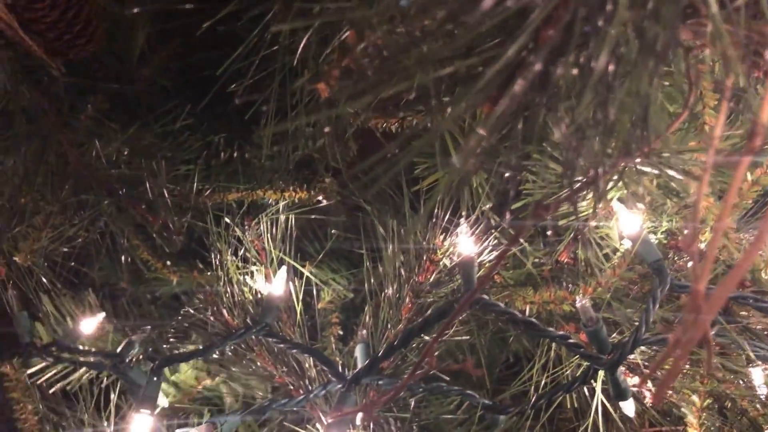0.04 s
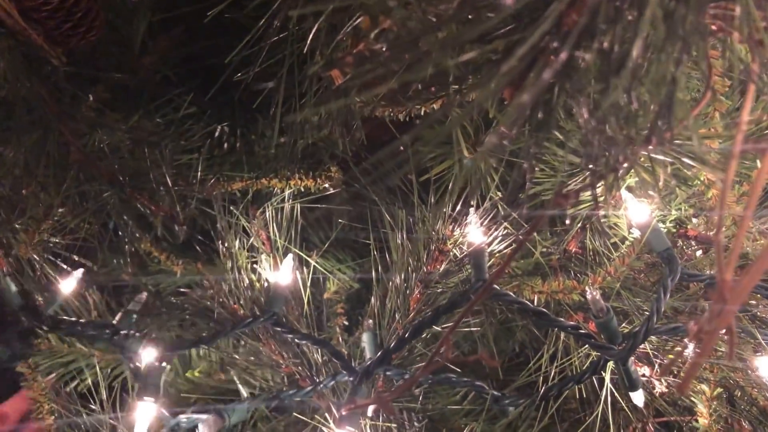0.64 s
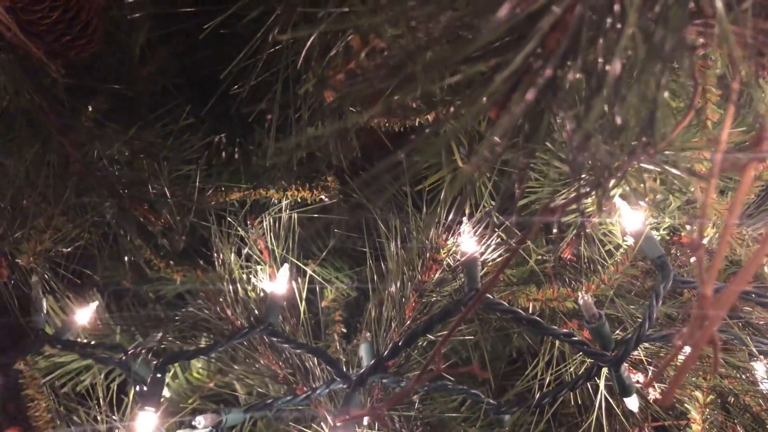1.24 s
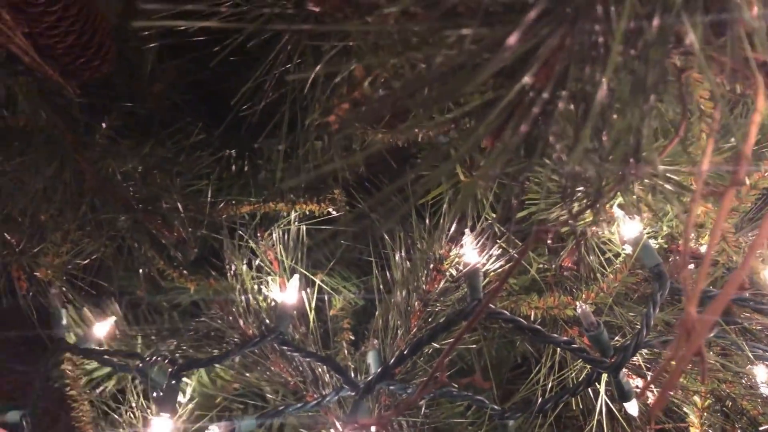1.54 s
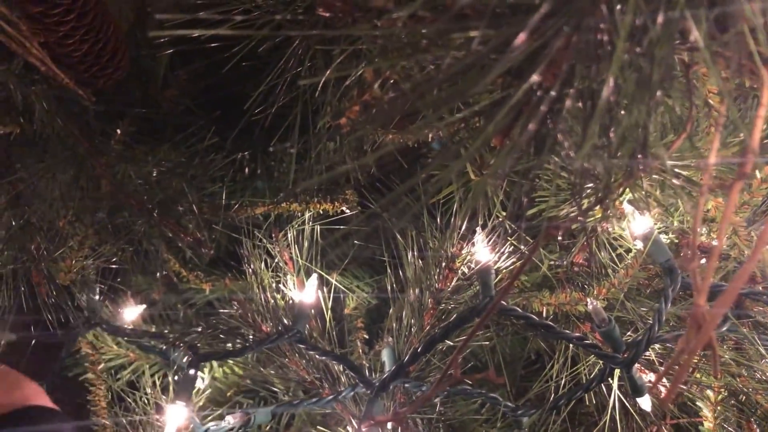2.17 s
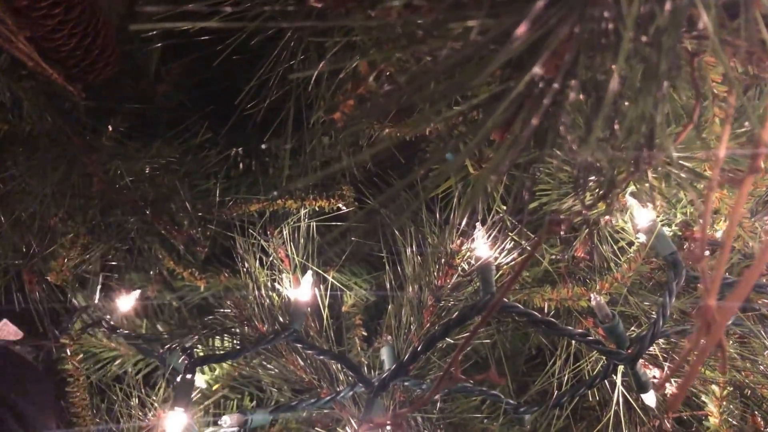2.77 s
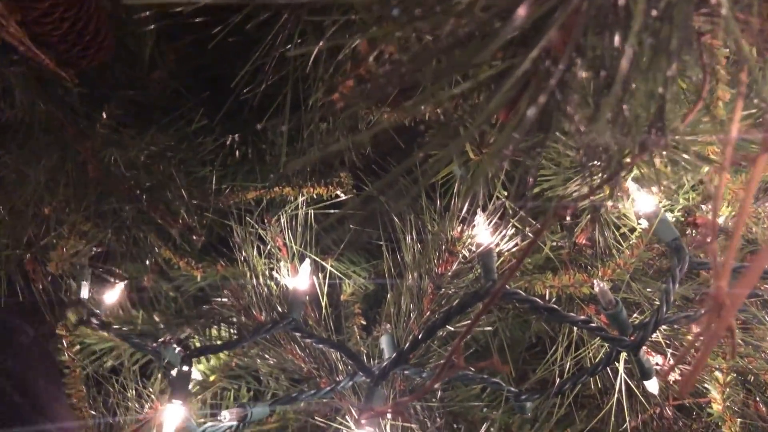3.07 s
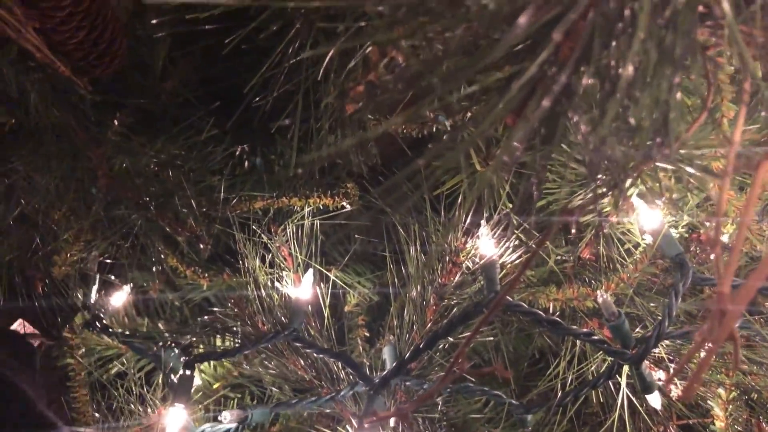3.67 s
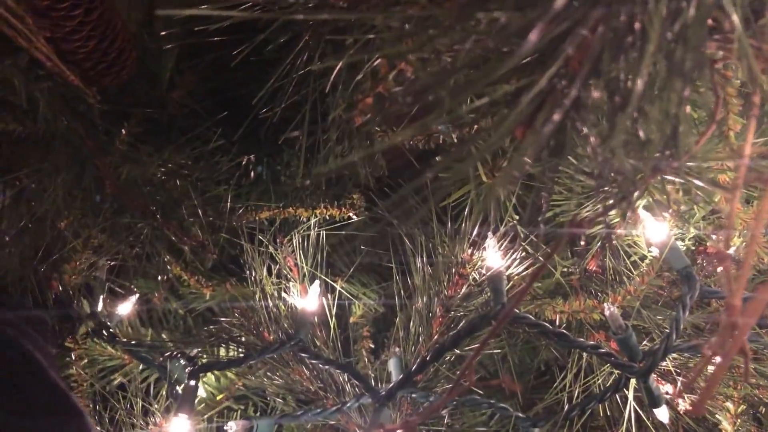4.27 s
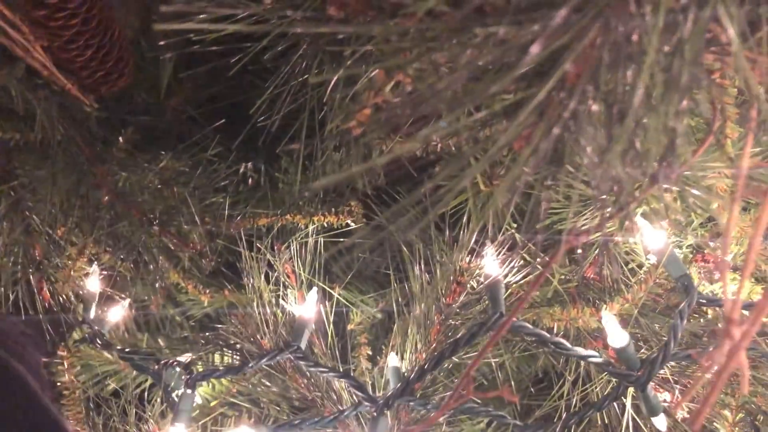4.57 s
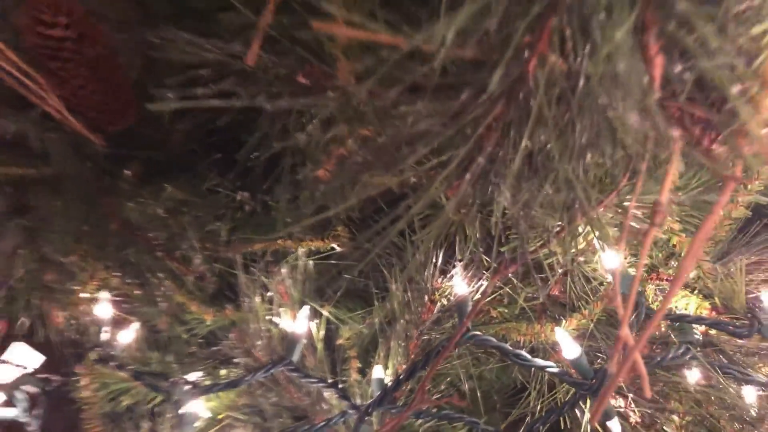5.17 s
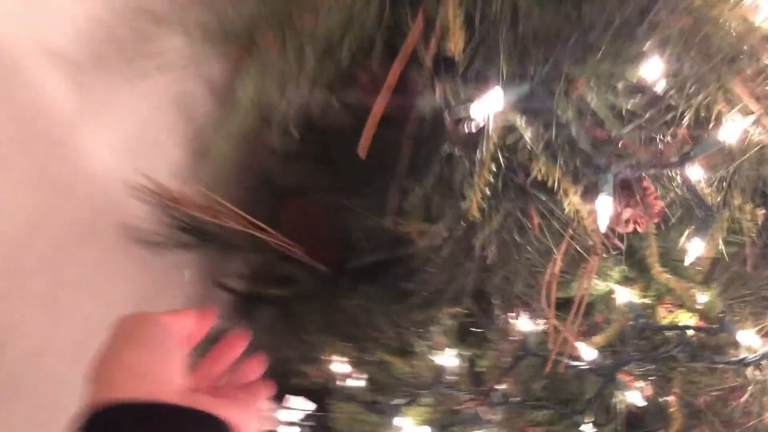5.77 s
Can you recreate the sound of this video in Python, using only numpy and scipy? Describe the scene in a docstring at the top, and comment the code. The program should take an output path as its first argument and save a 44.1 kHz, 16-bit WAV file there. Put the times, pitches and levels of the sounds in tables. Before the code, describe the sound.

Hands move through an artificial tree close to the microphone in a quiet room, making a soft, uneven hiss of plastic needles with tiny flicks throughout. Faint knocks further off lead to one distinct hollow knock at about 0.6 seconds. From 1 second, twigs and light wires stick and slip with small, sharp clicks and snaps. Between 1.6 and 2.3 seconds the clicks grow busier, joined by low thuds of wire branches springing back and a faint ring from the tree's frame. After a quieter moment, a crisp snap stands out near 3.3 seconds, followed by light ticks and bumps. From 4.1 to 4.7 seconds comes the loudest cluster, with sharp snaps and two heavier thumps at about 4.4 and 4.6. From around 5 seconds an arm sweeps through the needles in a smoother, fuller rustle, with a few last clicks before 6 seconds.

```python
"""Hands in an artificial fir

Close by in a quiet room, friction on plastic needles makes a hiss dotted with tiny flicks. Twigs and
light wires stick, slip and snap; wire branches thud as they spring back and set the frame ringing.
Hollow knocks, one of them distinct, come from further off. At the end an arm sweeps through the needles."""
import sys
import numpy as np
from scipy import signal
from scipy.fft import rfft, irfft, next_fast_len
from scipy.io import wavfile
from scipy.ndimage import uniform_filter1d

SR = 44100
rng = np.random.default_rng(int(sys.argv[2]) if len(sys.argv) > 2 else 0)


def unload_audio(sound):
    """Save the sound as a 16-bit wav file, at the path given as the first command line argument."""
    columns = np.transpose(np.atleast_2d(sound))
    # keep every value between -1 and 1, then stretch to whole-number steps
    steps = np.round(np.clip(columns, -1, 1) * 32767)
    wavfile.write(sys.argv[1], SR, steps.astype(np.int16))


N = 256328
TIME = np.arange(N) / SR


def undb(db):
    """Decibels to amplitude ratio."""
    return 10 ** (np.asarray(db) / 20)


def unit(x):
    """Normalisation to an rms of 1."""
    return x / np.sqrt(np.mean(x ** 2))


def add(out, start_s, x):
    """Superposition: x joins out from start_s on."""
    i = max(int(start_s * SR), 0)
    out[i:i + len(x)] += x[:max(len(out) - i, 0)]


def colour(x, outline):
    """Minimum-phase filtering to an outline of (frequency_hz, gain_db) points."""
    size = next_fast_len(2 * len(x), True)
    size += size % 2
    hz, db = np.transpose(outline)
    bins_hz = np.maximum(np.fft.rfftfreq(size, 1 / SR), 1)
    gain = undb(np.interp(np.log(bins_hz), np.log(hz), db))
    cepstrum = irfft(np.log(gain))
    cepstrum[1:size // 2] *= 2  # folding the cepstrum makes the filter causal
    cepstrum[size // 2 + 1:] = 0
    return irfft(rfft(x, size) * np.exp(rfft(cepstrum)))[:len(x)]


def resonate(x, hz, q, soft=1.93):
    """Second-order resonance; finite contact time rolls off the response above soft * hz."""
    s = 1j * np.fft.rfftfreq(2 * len(x), 1 / SR) / hz
    resonance = s / (q * (s * s + 1) + s)
    rolloff = 1 + np.sqrt(2) * s / soft + (s / soft) ** 2
    return irfft(rfft(x, 2 * len(x)) * resonance / rolloff)[:len(x)]


def wander(rate_hz):
    """Smooth random modulation with an rms of 1."""
    step = max(int(SR / rate_hz), 1)
    stairs = np.repeat(rng.standard_normal(N // step + 1), step)
    return unit(uniform_filter1d(stairs, step)[:N])


def burst(x, level_db):
    """Equivalent level: the energy of the hit, spread over 10 ms, is scaled to level_db."""
    return x * undb(level_db) / np.sqrt(np.sum(x ** 2) / (SR / 100))


def needles(outline, grit, per_s, spread_db, flick_s):
    """Shot noise: unequal flicks over a smooth sliding hiss; grit is the flicks' share of the power."""
    sizes = undb(spread_db * np.minimum(rng.exponential(size=N), 4))
    flicks = (rng.random(N) < per_s / SR) * sizes
    power = signal.lfilter([1], [1, -np.exp(-1 / (flick_s * SR))], flicks ** 2)
    envelope = np.sqrt(grit * power / power.mean() + 1 - grit)
    return unit(colour(envelope * rng.standard_normal(N), outline))


def pings(low_hz=3000, high_hz=12000, lengths=22, per_s=8, spread_db=3, q=8, scrape_s=0.0032):
    """Plucked cantilevers: needles scrape past a finger and spring free, each length at its own pitch."""
    out = np.zeros(N)
    for hz in np.geomspace(low_hz, high_hz, lengths):
        released = rng.random(N) < per_s / SR
        flicks = released * undb(spread_db * np.minimum(rng.exponential(size=N), 3))
        envelope = signal.lfilter([1], [1, -np.exp(-1 / (scrape_s * SR))], flicks + 1e-12)
        scrape = envelope * rng.standard_normal(N)
        out += signal.lfilter(*signal.iirpeak(hz, q, fs=SR), scrape)
    return unit(out)


# Spectra of brushed sprays, needle tips and swaying branches: frequency_hz, gain_db
BRUSH_SPECTRUM = [(150, -3.5), (320, -4.5), (600, -2.5), (1100, -6), (2200, -6.5), (4500, -8), (9000, -13),
                  (16000, -24.5)]
TIP_SPECTRUM = [(2000, -49), (4500, -4), (7500, -2), (11000, 0), (16000, -1.5)]
SWAY_SPECTRUM = [(25, -74), (45, 6.5), (80, 5.5), (150, 2.5), (240, 1), (400, -28.5), (900, -52)]
# The hands' activity, before each layer's trim: time_s, brush_db, tips_db, sway_db
HAND_LEVELS = [(0.0, -60.5, -56.5, -55), (0.36, -64, -62, -63), (0.72, -61, -57, -59),
               (0.98, -66, -67, -61.5), (1.14, -56.5, -59, -59), (1.55, -59, -59.5, -61),
               (1.8, -55.5, -53, -48), (2.12, -62, -57, -53.5), (2.38, -61, -56, -57.5),
               (3.08, -67, -64.5, -61), (3.38, -59, -57, -56.5), (3.56, -59.5, -84, -53),
               (3.9, -69.5, -77, -49), (4.16, -59.5, -72, -66), (4.48, -86, -66, -47),
               (4.59, -52.5, -61.5, -50), (4.8, -62, -74, -51.5), (5.04, -52.5, -56, -57),
               (5.4, -55.5, -57.5, -55.5), (5.81, -51.5, -46, -62.5)]


def rustle(brush_trim_db=-1, tips_trim_db=-7, sway_trim_db=-4, pings_db=1, sweep_s=5.2, blur_s=0.25):
    """Friction noise: the hands brush whole sprays, tickle the needle tips and rock the branches."""
    time_s, *levels = np.transpose(HAND_LEVELS)
    brush_db, tips_db, sway_db = (np.interp(TIME, time_s, level) for level in levels)
    # single needles stand out while fingers pick at them, and blur once the whole arm sweeps through
    distinctness = undb(np.interp(TIME, [sweep_s, sweep_s + blur_s], [-1.5, -3.5]))
    grit = 0.6 * distinctness
    sprays = needles(BRUSH_SPECTRUM, grit, per_s=230, spread_db=13, flick_s=0.009)
    tips = needles(TIP_SPECTRUM, grit, per_s=1100, spread_db=14, flick_s=0.0019)
    tips += undb(pings_db) * distinctness * pings()
    sway = unit(colour(rng.standard_normal(N), SWAY_SPECTRUM)) * undb(2 * wander(rate_hz=10))
    return (sprays * undb(brush_db + brush_trim_db)
            + tips * undb(tips_db + tips_trim_db)
            + sway * undb(sway_db + sway_trim_db))


# Spectrum of the quiet room: frequency_hz, gain_db
AIR_SPECTRUM = [(25, -34), (64, 1), (220, -5), (320, 1.5), (860, -10), (2500, -23), (7000, -42),
                (16000, -25)]


def room_air(level_db=-64):
    """Stationary background noise, strongest in the bass."""
    return undb(level_db) * unit(colour(rng.standard_normal(N), AIR_SPECTRUM))


# Spectrum of a knock's onset: frequency_hz, gain_db
KNOCK_SPECTRUM = [(120, -4), (240, 9), (380, -20), (560, 13), (820, -30), (1100, 3), (1620, -0.5),
                  (2800, -1), (5000, -3.5), (16000, -20.5)]
# Its hollow resonances: pitch_hz, t60_s, gain_db
KNOCK_MODES = [(258.6, 0.4, -8.5), (402.5, 0.43, -15.5), (551, 0.18, -6.5), (846, 0.16, -4),
               (1066, 0.081, -4), (1645, 0.087, -4.5)]
# Knocks further off in the room: start_s, level_db
KNOCKS = [(.137, -59), (0.4236, -52), (0.5652, -35)]


def far_knocks(hold_s=0.0033, bright_s=0.011, dull_s=0.03, dull_hz=900, dull_db=-9, hollow_db=-4):
    """Multipath arrival: a distant knock is a cluster of reflections whose low modes last longest."""
    out, t = np.zeros(N), TIME[:12000]
    for start_s, level_db in KNOCKS:
        early, late = rng.standard_normal((2, len(t)))
        bright = unit(colour(early, KNOCK_SPECTRUM)) * np.exp(-np.maximum(t - hold_s, 0) / bright_s)
        dull = unit(resonate(late, dull_hz, q=0.4)) * np.exp(-t / dull_s)
        hollow = sum(undb(gain_db - 60 * t / t60_s) * np.sin(2 * np.pi * pitch_hz * t)
                     for pitch_hz, t60_s, gain_db in KNOCK_MODES)
        add(out, start_s, burst(bright + undb(dull_db) * dull + undb(hollow_db) * hollow, level_db))
    return out


# Branches bumped or let go: start_s, level_db, nominal_pitch_hz
BRANCH_THUDS = [(0.208, -51, 260), (0.238, -50.5, 310), (0.582, -46.5, 242), (1.336, -51.5, 141),
                (1.616, -40, 132), (1.675, -34.5, 126), (1.825, -38.5, 131), (1.951, -46, 162),
                (2.04, -45, 120), (2.215, -35.5, 118), (2.642, -47.5, 123), (3.014, -44, 120),
                (3.049, -46.5, 113), (3.133, -45.5, 135), (3.273, -48.5, 605), (3.273, -41, 127),
                (3.422, -49, 113), (3.563, -48.5, 115), (3.653, -49.5, 128), (3.747, -46, 90),
                (3.81, -44, 600), (3.816, -41.5, 112), (4.116, -38.5, 696), (4.115, -38.5, 135),
                (4.16, -43.5, 99.5), (4.25, -45, 122), (4.345, -41, 360), (4.345, -32.5, 184),
                (4.393, -40.5, 454), (4.395, -27.5, 152), (4.404, -35, 67), (4.432, -29.5, 143),
                (4.496, -41, 121), (4.6216, -23.5, 500), (4.627, -21, 153), (4.68, -30, 174),
                (4.974, -48, 113), (5.009, -44, 126)]


def branch_thuds(swell_cycles=1.54, hard_db=-19.5, glide=0.61, settle=0.76, rough=0.51,
                 heave_db=-14, heave_ratio=0.497):
    """Dispersion: a branch swings briefly; its faster bending waves arrive first, so the pitch falls."""
    out, t = np.zeros(N), TIME[:8192]
    for start_s, level_db, nominal_hz in BRANCH_THUDS:
        # a blow at hard_db peaks in half the time of a gentle one
        swell_s = swell_cycles / nominal_hz / (1 + undb(level_db - hard_db) ** 2)
        age = t / swell_s
        pitch_hz = nominal_hz * (settle + glide * np.exp(-age / 1.15))
        phase = 2 * np.pi * (np.cumsum(pitch_hz) / SR + rng.random())
        shudder = unit(resonate(rng.standard_normal(len(t)), nominal_hz, q=0.9, soft=1.9))
        swing = (age * np.exp(1 - age)) ** 2.04 * (np.sin(phase) + rough * shudder)
        # the whole branch heaves more slowly and for longer than its tip
        heave = (age / 2 * np.exp(1 - age / 2)) ** 4.7 * np.sin(heave_ratio * phase)
        add(out, start_s, undb(level_db) * (swing + undb(heave_db) * heave))
    return out


# Normal modes of the tree's frame: pitch_hz, t60_s, gain_db
TREE_MODES = [(50.3, 0.18, -4), (76.2, 0.31, 6.5), (106, 0.21, -32), (162.3, 0.3, 1.5), (221, 1, 5.5),
              (378, 0.49, -1.5), (545, 0.11, 6.5)]


def frame_ring(thuds):
    """Modal resonance: the trunk and its hinged arms, driven by the thuds, ring on after each."""
    out = np.zeros(N)
    for pitch_hz, t60_s, gain_db in TREE_MODES:
        pole = np.exp((2j * np.pi * pitch_hz - np.log(1000) / t60_s) / SR)
        out += undb(gain_db) * 2 * (1 - abs(pole)) * signal.lfilter([1], [1, -pole], thuds).real
    return out


# Twigs, wires and bulb holders slipping free: start_s, level_db, body_hz, ring_hz, contact_decay_s
TWIG_SNAPS = [(0.507, -51.5, 4730, 8250, 0.022), (0.7088, -54.5, 10000, 14000, 0.015),
              (0.8454, -49, 5300, 7700, 0.02), (0.8676, -47.5, 4260, 9000, 0.0049),
              (0.893, -51.5, 9050, 14700, .0013), (1.0295, -54, 3500, 13650, 0.0034),
              (1.0741, -38, 3670, 2570, 0.0019), (1.099, -48, 7000, 8800, .025),
              (1.2405, -42, 8800, 11860, 0.0012), (1.253, -33, 11100, 14500, 0.004),
              (1.35, -42.5, 4900, 6240, 0.012), (1.371, -47.5, 4000, 7900, 0.0043),
              (1.3951, -49.5, 4700, 2830, .0019), (1.4056, -42, 8400, 9380, 0.026),
              (1.588, -47.5, 11000, 7200, 0.0006), (1.6018, -46, 8300, 12100, 0.019),
              (1.6679, -48.5, 7650, 8200, 0.011), (1.7279, -43.5, 7000, 9380, .0061),
              (1.818, -41, 4500, 3560, 0.0054), (1.8695, -38, 14000, 14500, 0.00028),
              (1.938, -45.5, 5040, 7600, .002), (1.9443, -38, 7160, 8950, 0.0036),
              (1.9513, -38, 5140, 5270, 0.0037), (1.9717, -42.5, 5260, 6360, 0.0083),
              (2.0936, -49.5, 6160, 3600, 0.0026), (2.1441, -43.5, 5100, 7000, 0.051),
              (2.1834, -36.5, 6130, 9100, .0063), (2.211, -38.5, 4500, 2000, 0.0041),
              (2.2155, -32.5, 5060, 5600, 0.0024), (2.227, -36.5, 7000, 11800, 0.0028),
              (2.242, -43.5, 5600, 9100, 0.0055), (2.473, -46.5, 3940, 8400, 0.0028),
              (2.5194, -50.5, 8650, 15000, 0.0037), (2.6327, -45.5, 4040, 8100, 0.0029),
              (2.792, -50, 5850, 6000, 0.024), (3.1267, -53.5, 4100, 3020, 0.01),
              (3.2586, -35, 8300, 8600, 0.016), (3.27, -30, 6600, 7800, 0.0034),
              (3.2902, -36, 6860, 2760, 0.0019), (3.4131, -49, 5760, 7100, 0.0048),
              (3.4416, -49.5, 3320, 2900, 0.0029), (3.5543, -45.5, 6400, 10400, .003),
              (3.587, -52, 4000, 10700, 0.0038), (3.6584, -49, 2800, 1170, 0.0041),
              (3.7932, -45, 3700, 9000, 0.0052), (3.8094, -48.5, 2200, 1120, 0.007),
              (3.863, -59, 5000, 8530, 0.011), (4.0887, -55.5, 8000, 11000, 0.021),
              (4.111, -32.5, 8000, 10100, 0.006), (4.3433, -45, 2640, 5450, 0.0041),
              (4.3846, -38, 4540, 5100, 0.0029), (4.3885, -26, 7700, 4700, 0.002),
              (4.3907, -32, 3950, 4570, 0.0065), (4.409, -37, 2930, 4600, .007),
              (4.4141, -35.5, 2960, 2140, 0.0045), (4.4283, -44.5, 3200, 4430, 0.014),
              (4.6199, -36.5, 1840, 1070, 0.004), (4.644, -54, 1600, 8900, 0.0015),
              (4.6729, -32, 3500, 13500, 0.0053), (4.7362, -52, 4070, 6300, 0.0033),
              (5.0023, -46.5, 3380, 8450, 0.0046), (5.597, -44, 5060, 12160, .0015),
              (5.713, -49, 5030, 13030, 0.007)]


def twig_snaps(rise_s=0.00096, crack_s=0.00068, crack_db=5, chatter_db=5, reference_hz=5530,
               ring_db=-2, damping_db=4, clean_contact_s=0.0033,
               shiver_hz=6000, shiver_s=0.014, shiver_db=-18,
               stem_hz=620, stem_s=0.0096, stem_db=-13, thick_hz=3000,
               lead_in_s=0.0048, lead_in_db=-24, lead_in_uneven_db=10):
    """Stick-slip friction: a crack and a chatter of plastic ring one twig; nearby needles shiver on."""
    out, t = np.zeros(N), TIME[:4096]
    for start_s, level_db, body_hz, ring_hz, contact_s in TWIG_SNAPS:
        slip_noise, grip_noise, needle_noise, stem_noise, lead_in_noise = rng.standard_normal((5, len(t)))
        grip = unit(uniform_filter1d(grip_noise, size=24))
        crack = undb(crack_db) * np.exp(-t / crack_s)
        chatter = undb(chatter_db * grip) * np.exp(-t / contact_s)
        slip = np.tanh(slip_noise) * (crack + chatter) * np.minimum(t / rise_s, 1)
        # thinner, higher twigs resonate more sharply
        body_q = 0.91 * (body_hz / reference_hz) ** 1.6
        ring_q = 6 * np.sqrt(ring_hz / reference_hz)
        body = unit(resonate(slip, body_hz, body_q))
        # the ring builds a moment after the slip; each doubling of the contact time costs damping_db
        ring_gain = undb(ring_db - damping_db * np.log2(contact_s / clean_contact_s))
        ring = ring_gain * unit(resonate(np.roll(slip, shift=14), ring_hz, ring_q))
        shiver = unit(resonate(needle_noise * np.exp(-t / shiver_s), shiver_hz, q=0.19))
        # thick twigs snap lower and pass more of the blow to their stem
        stem_gain = undb(stem_db) * min(thick_hz / body_hz, 1) / (1 + ring_gain)
        stem = unit(resonate(stem_noise * np.exp(-t / stem_s), stem_hz, q=0.56))
        snap = unit(body + ring) + undb(shiver_db) * shiver + stem_gain * stem
        add(out, start_s, burst(snap, level_db))
        # a faint, uneven noise swells for a few milliseconds into each snap, softening its attack
        swell = np.exp((t - t[-1]) / lead_in_s) * undb(lead_in_uneven_db * grip)
        lead_in = resonate(lead_in_noise * swell, body_hz, body_q)
        add(out, start_s - t[-1], burst(lead_in, level_db + lead_in_db))
    return out


def reverberation(x, mid_t60_s=0.33, mid_db=-18.5, treble_t60_s=0.36, treble_db=-25, onset_s=0.001):
    """Diffuse reflection: a furnished room returns a faint, short tail that decays exponentially."""
    t = TIME[:SR // 2]
    mids, treble = rng.standard_normal((2, len(t))) * (1 - np.exp(-(t / onset_s) ** 2))
    mids = resonate(mids * undb(-60 * t / mid_t60_s), hz=1900, q=0.02)
    treble = resonate(treble * undb(-60 * t / treble_t60_s), hz=11400, q=1.0, soft=2.6)
    tail = undb(mid_db) * mids / np.linalg.norm(mids) + undb(treble_db) * treble / np.linalg.norm(treble)
    return signal.fftconvolve(x, tail)[:N]


def scene():
    """Superposition of the hits, their reverberation, the room's air and the rustle, in one channel."""
    thuds = branch_thuds()
    hits = twig_snaps() + far_knocks() + thuds + frame_ring(thuds)
    air = room_air()
    return (hits + reverberation(hits) + rustle() + air)[None]


def record(dry, low_hz=36, top_hz=16300):
    """Band limiting: a gentle high-pass drops the deepest bass and a steep low-pass cuts the top."""
    high_pass = signal.butter(2, low_hz, "high", fs=SR, output="sos")
    low_pass = signal.ellip(8, 0.2, 70, top_hz, fs=SR, output="sos")
    return signal.sosfilt(low_pass, signal.sosfilt(high_pass, dry))


dry = scene()
out = record(dry)
unload_audio(out)
```